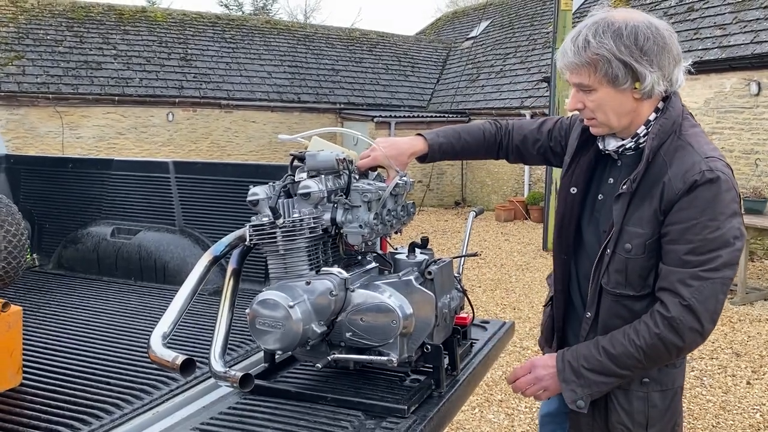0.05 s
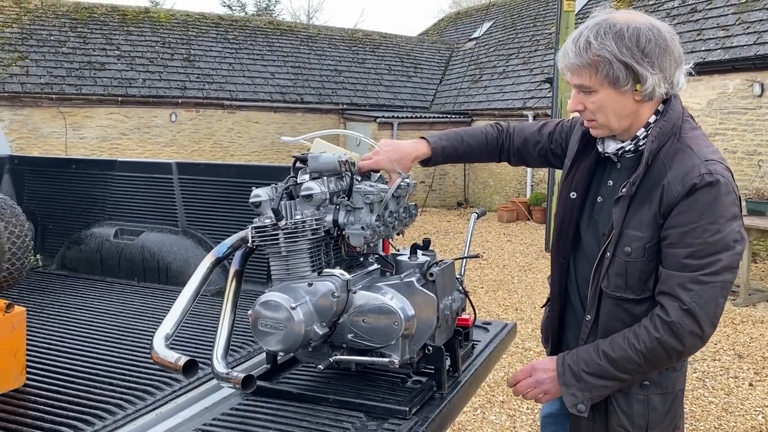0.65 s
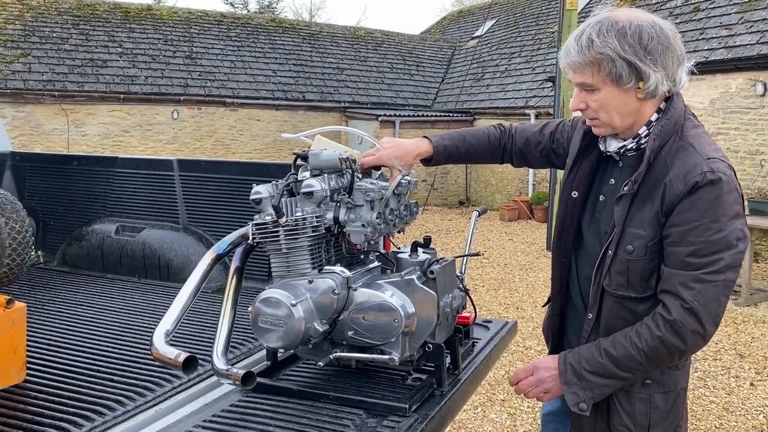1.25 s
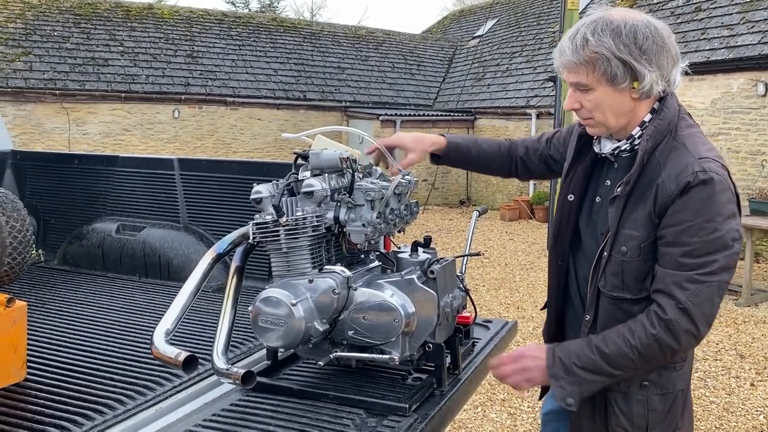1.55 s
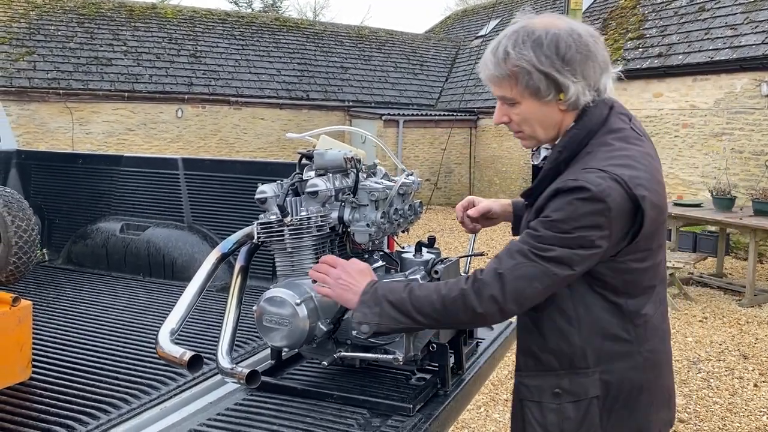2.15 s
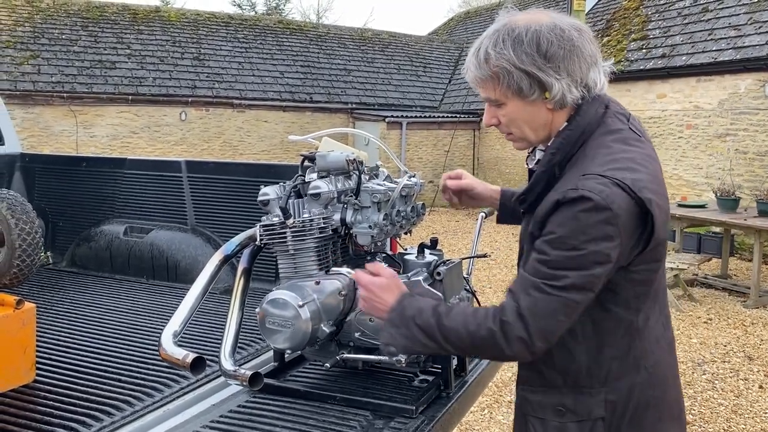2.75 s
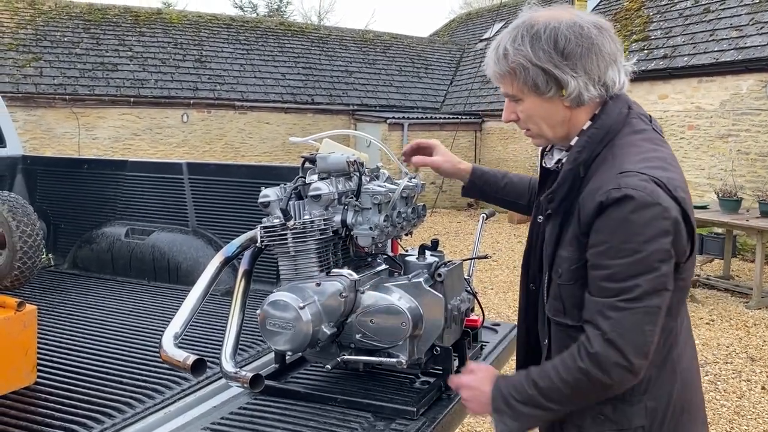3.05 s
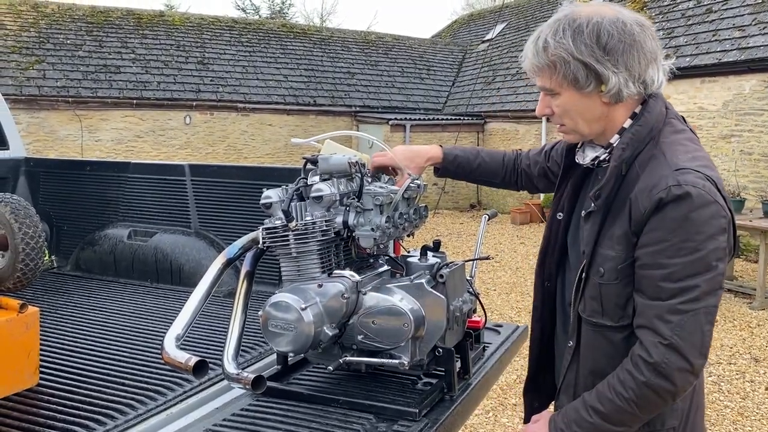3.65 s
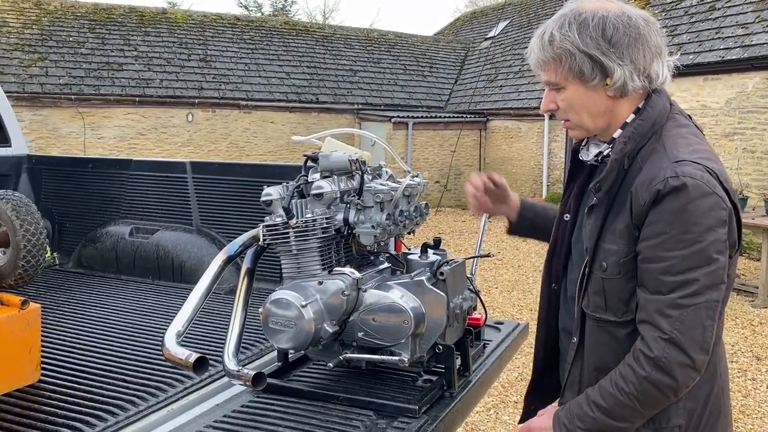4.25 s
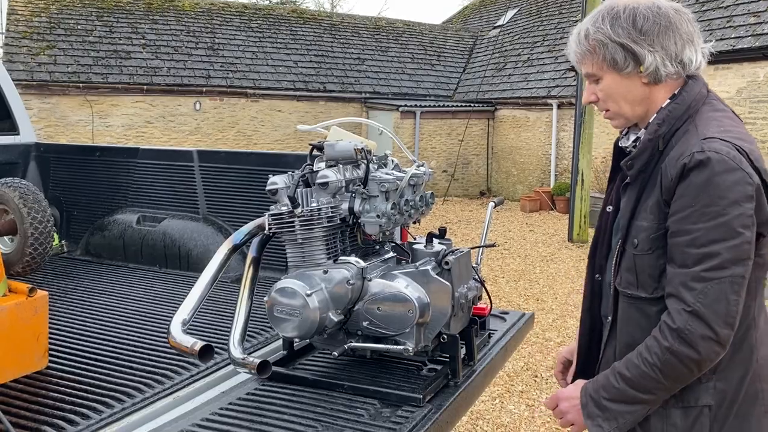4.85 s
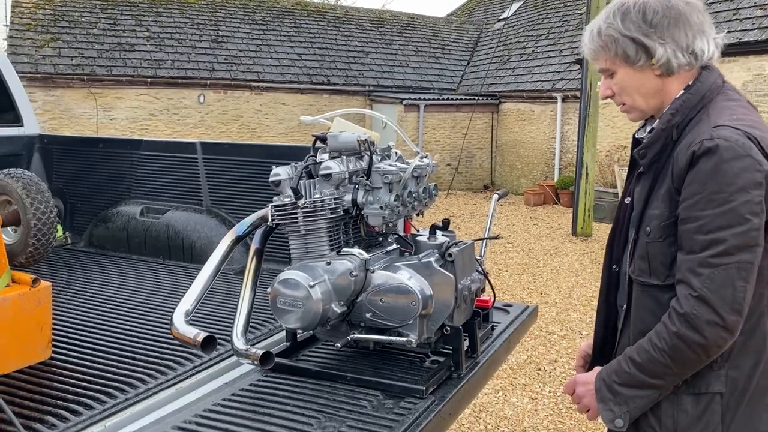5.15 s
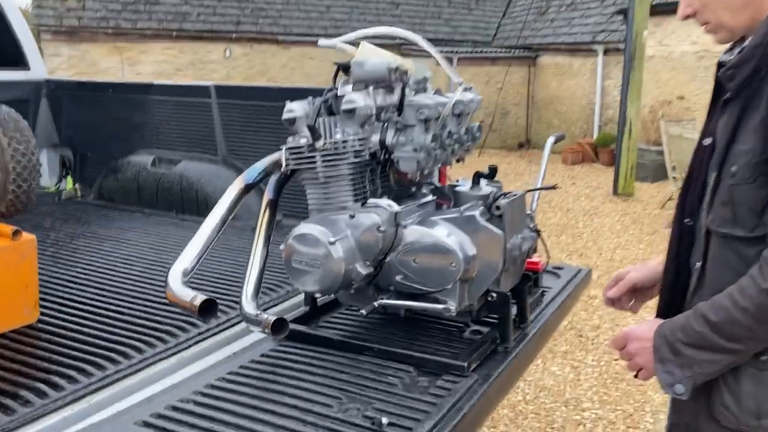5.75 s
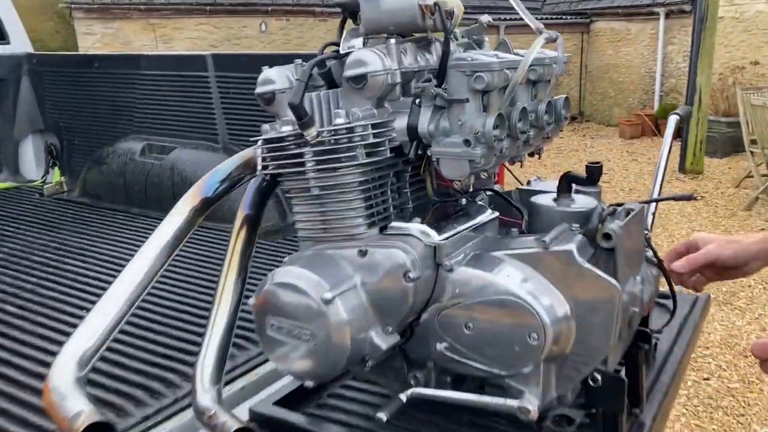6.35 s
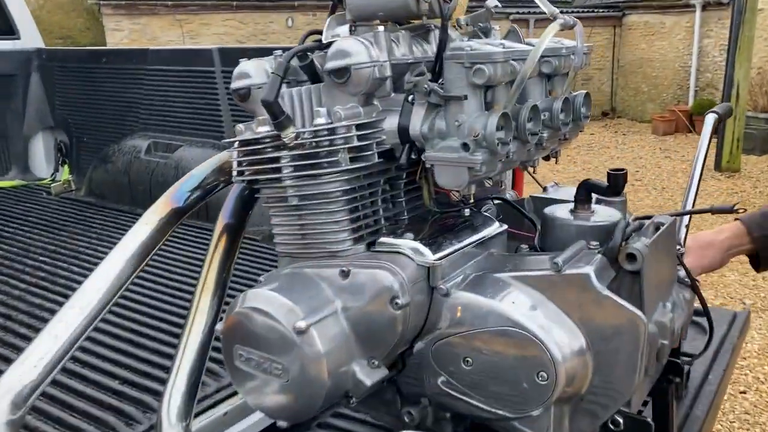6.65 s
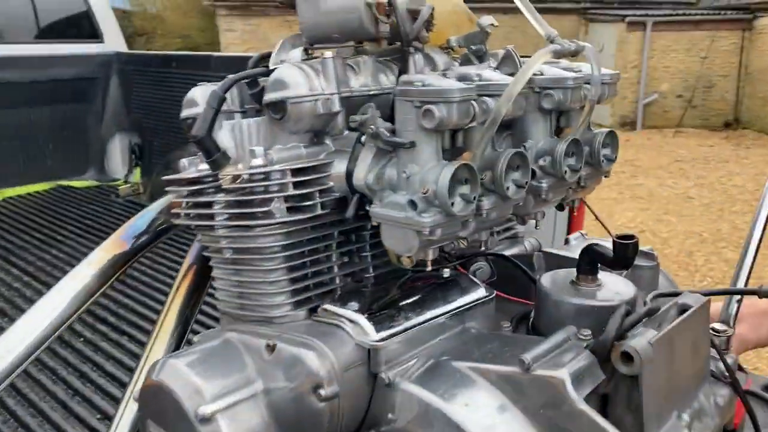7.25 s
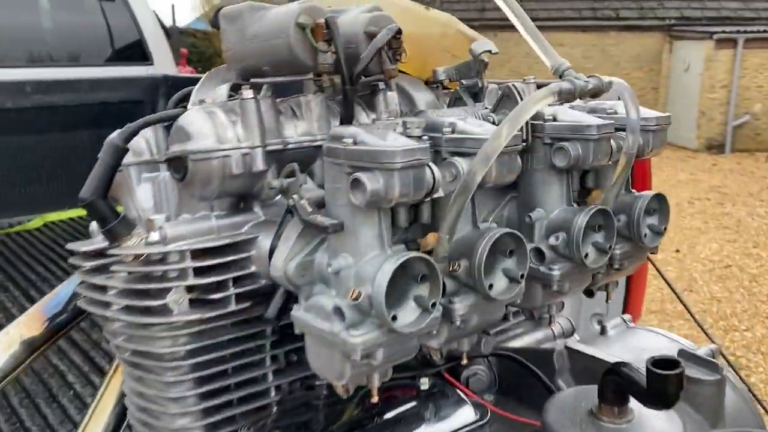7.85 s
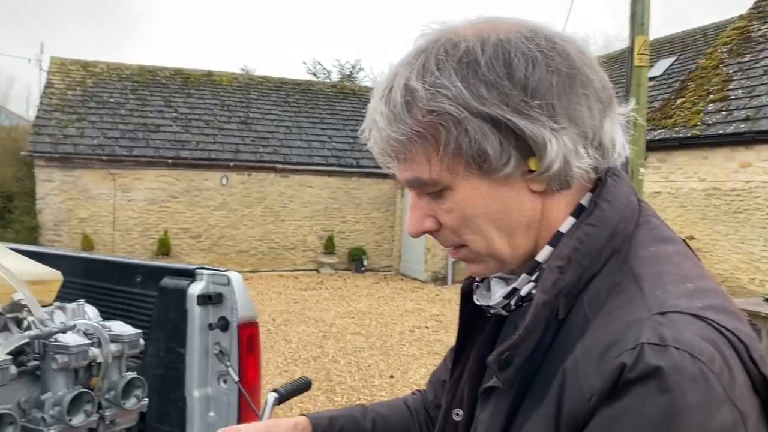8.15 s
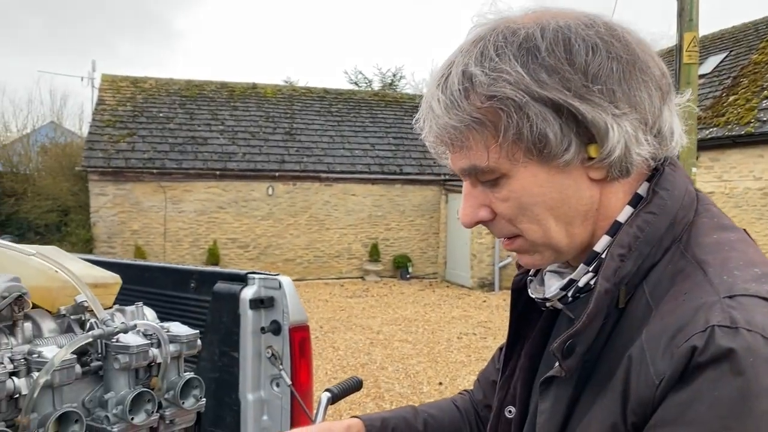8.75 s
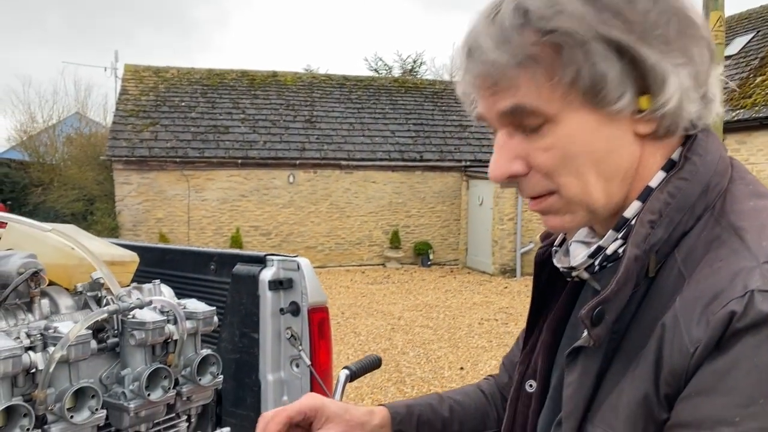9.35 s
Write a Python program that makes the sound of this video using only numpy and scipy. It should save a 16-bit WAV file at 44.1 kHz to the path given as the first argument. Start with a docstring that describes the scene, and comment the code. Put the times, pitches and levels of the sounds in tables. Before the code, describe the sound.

A motorcycle engine on open pipes revs once, settles to a loping idle, stalls, and is restarted by its electric starter.

```python
"""A bare four-cylinder motorcycle engine runs on open pipes on a pickup bed in a walled yard.
It is blipped, settles to a loping idle, dies, and is cranked back to life by the electric starter.
Every firing booms and rasps in its own pipe and spits hiss; one cylinder barks much harder than
the rest. Valve gear and chain clatter, the starter's gears grind, whine and knock on the case,
and the stone walls send back a short wash over a faint distant rumble."""
import sys
import numpy as np
from scipy import signal
from scipy.fft import rfft, irfft, next_fast_len
from scipy.io import wavfile
from scipy.ndimage import uniform_filter1d

SR = 44100
rng = np.random.default_rng(int(sys.argv[2]) if len(sys.argv) > 2 else 0)


def generate_wav(signal):
    """Clip the signal to [-1, 1] and save it as 16-bit WAV at the path in sys.argv[1]."""
    frames = np.transpose(np.atleast_2d(signal))
    scaled = np.clip(frames, -1, 1) * 32767
    pcm = np.round(scaled).astype(np.int16)
    wavfile.write(sys.argv[1], SR, pcm)


N = 423801
TIME = np.arange(N) / SR
DIRECT = np.array([[1], [0]])   # layers have a direct and a diffuse row; this fills only the first
IDLE_RPM, STANDSTILL_DB_PER_S = 1100, 401

# The cylinders in firing order, the barking one first. Each row: offset as a share of the cycle,
# boom in dB, boom tuning ratio, boom lag in seconds, rasp in dB, light spit in dB re the boom.
CYLINDERS = [(0, 1.5, 1.023, .002, 8.5, -40), (0.296, 1.6, 1.128, -.0051, -10.5, -14),
             (.555, -5.5, 1.101, -.0004, 0.5, -26.5), (.795, -5, 1.105, -.0021, -2, -27)]
# Crank speed, one run up to the stall and one from the restart. Each row: time in seconds, rpm.
CRANK_RUNS = [
    [(-.055, 1073), (.184, 1065), (.388, 2292), (.576, 1956), (.819, 1663), (1.259, 1475), (1.816, 1263),
     (2.358, 1260), (2.756, 1221), (3.439, 1096), (4.008, 1128), (5, 1071), (5.11, 1119), (6.03, 1066),
     (6.48, 1080), (6.63, 1095), (7.44, 812), (7.62, 400)],
    [(8.81, 1070), (9.04, 1017), (9.17, 1165), (9.61, 1282)],
]
# How hard the engine pulls. Each row: time in seconds, effort in dB re idle.
EFFORT = [(0, 5.5), (.12, 2.5), (.27, 7), (.45, 15.5), (.56, 10), (.67, 8), (1.1, 7), (3.1, 1), (3.7, 1.5),
          (5.5, 0), (6.55, -1), (6.85, -5.5), (7.1, -3.5), (7.4, -16.5), (8.81, -14), (8.97, -10),
          (9.4, -4.5)]
# The listener walks up to the engine and round to its rear.
# Each row: time in seconds, nearness in dB, left over right in dB.
WALK = [(0, -2, 1), (3.1, -1.5, 1.5), (5.5, 1, 0.5), (6.35, 5, 0.7), (7.2, 4.5, 1), (8.2, -6.5, 3),
        (8.8, 4.5, 2), (9.6, 5, 3)]
# Low and middle resonances of an open pipe and the bed under it.
# Each row: pitch in Hz before tuning, level in dB, t60 in seconds, swell in seconds.
BOOM_MODES = [(50, -36, 0.021, 0.034), (134.3, -1, 0.027, 0.004), (143.4, 5.5, 0.093, 0.033),
              (222.5, -22.5, 0.13, 0.012)]
RASP_MODES = [(406.7, -6, 0.091, 0.013), (478, -7.5, 0.1, 0.019), (569, -13.5, 0.08, 0.0099),
              (790, -26.5, 0.037, 0.0051), (897, -28, 0.046, 0.0028), (1084, -22, 0.13, 0.011),
              (1286, -25.5, 0.12, 0.0056)]
# The alloy crankcase and its fins. Each row: pitch in Hz, level in dB, t60 in seconds.
CASE_MODES = [(898, 3, 0.1), (1097.5, -6, 0.14), (1282, -0.5, 0.085), (1644, -12, 0.05), (1910, -29, 0.97),
              (2006, -10.5, 0.03), (2530, -12, 0.083), (2470, -20.5, 0.1), (2960, -16, 0.018),
              (4300, -35.5, .04), (6600, -18.5, 0.065)]
# Noise colours of valve gear, gas jets and gears. Each row: frequency in Hz, relative level in dB.
CLATTER_SPECTRUM = [(150, -5), (330, 7), (600, 6), (950, 3), (1300, -5), (1600, -1.5), (2900, -9),
                    (3500, -13), (4400, -17.5), (5800, -16), (6900, -16), (8000, -16.5), (10500, -18.5),
                    (13500, -18.5), (16000, -35)]
HISS_SPECTRUM = [(500, -13.5), (1300, -10.5), (1900, -2), (2350, 0), (2700, -4.5), (3000, -2.5),
                 (3450, -5.5), (4300, 1), (5000, -3), (5500, -7), (6000, -5.5), (6900, 0), (7600, -2),
                 (8400, -3.5), (9300, 1), (10500, -1.5), (11800, 1.5), (13200, -3.5), (14500, -6),
                 (16000, -10.5)]
GRIND_SPECTRUM = [(100, -14.5), (300, -4), (750, -12.5), (840, -1), (905, 5), (990, -1), (1200, -2.5),
                  (1305, 7.5), (1420, -2.5), (2400, -3), (3300, -10), (4500, -14.5), (7000, -12.5),
                  (10000, -16), (14000, -26), (16000, -43.5)]


def exhaust(boom_gain, valve_lead_s=0.00399, jitter_s=0.00037, scatter_t60=0.19):
    """Each blowdown rings its pipe; the ribbed bed scatters it, differently for every pipe mouth."""
    # Colour of the scatter. Each row: frequency in Hz, relative level in dB.
    scatter_spectrum = [(200, -22), (262, 21.5), (340, -10), (430, 5.5), (570, -6), (700, -15.5),
                        (1100, -10), (1500, -33), (2500, -22.5), (5000, -43.5)]
    boom, rasp, t = 0, 0, TIME[:SR // 6]
    rasp_ring = pipe(RASP_MODES, 0.96, glide=0.034, heat_s=0.016) * DIRECT
    scatter_shape = from_db(-17 - 60 * t / scatter_t60) * (1 - np.exp(-t / 0.001))
    for share, boom_db, tuning, lag, rasp_db, _ in CYLINDERS:
        times = firings(share)
        late, boom_luck, rasp_luck = rng.standard_normal((len(times), 3)).T
        times = times + jitter_s * late
        burn_db = 0.38 * odd_burns(times) * (share == 0)   # a misfire hardly booms
        boom_ring = pipe(BOOM_MODES, tuning, glide=0.33, heat_s=0.0097)
        boom += through(clicks(times + lag, from_db(boom_db + burn_db + 2 * boom_luck)), boom_ring)
        blowdowns = clicks(times - valve_lead_s, from_db(rasp_db + burn_db + 2.5 * rasp_luck))
        rasp += through(blowdowns, rasp_ring + scatter_shape * noise(scatter_spectrum, len(t)))
    boom = filtered(boom, 2, 34, "high")   # a small mouth radiates no deep bass
    rasp_gain = exhaust_gain(-31.5 + in_time(EFFORT)[0])
    return boom_gain * evened(boom * DIRECT) + rasp_gain * evened(rasp)


def pipe(modes, tuning, glide, heat_s):
    """Standing waves build up and die; hot gas pulls their pitch up, then it sags as the pipe cools."""
    t = TIME[:SR // 6]
    heat = t / heat_s * np.exp(1 - t / heat_s)
    clock = np.cumsum(tuning * (1 + glide * (heat - .85))) / SR
    return sum(from_db(db - 60 * t / t60) * (1 - np.exp(-t / swell)) ** 2
               * np.sin(2 * np.pi * hz * clock) for hz, db, t60, swell in modes)


def throats(detune=0.012, limit_octaves=0.596):
    """Hot gas bends each pipe's note: a rising whoop after the bark, steadier elsewhere and at speed."""
    # One note per pipe. Each row: delay at idle in seconds, level in dB, base pitch in Hz, sweep at
    # idle in octaves per second, swell and fade in seconds, weight of the effort, brightness in dB.
    pipe_notes = [(.015, 1.5, 430, 23, 0.011, 0.016, 0.93, 0.5),
                  (0.00095, -7, 592, 0, 0.007, 0.011, 1.03, 0),
                  (0.00501, 0, 476, -0.5, 0.0037, 0.016, 1.01, 0.5),
                  (.008, -8, 462, 9, 0.0074, 0.013, 1.24, 7.5)]
    # The tone drifts. Each row: time in seconds, brightness in dB, lift in dB, pitch ratio.
    colour_drift = [(0, -5.5, -1, 0.99), (5.5, 5, 0.5, 0.98), (6.2, 6.5, 0.5, 0.99), (6.33, 11, 2.5, 0.99),
                    (6.52, 6, 1, 0.97), (6.66, 10.5, 1.5, 1.02), (6.8, 5, -0.5, 1.075), (7.3, 3, 1.5, 1),
                    (8.9, -1, 6, 1.05), (9.3, 3.5, 3.5, 1.07), (9.6, -6, -3.5, 1.07)]
    # Higher standing waves. Each row: pitch ratio, level in dB.
    overtones = [(1.699, -21.5), (2.4, -22.5), (3.051, -28.5)]
    t, out = np.arange(-SR // 25, SR // 20) / SR, np.zeros(N + SR)
    for (share, *_), (delay, db, hz, sweep, swell, fade, follows, edge_db) in zip(CYLINDERS, pipe_notes):
        times = firings(share)
        slowness = IDLE_RPM / in_time(np.concatenate(CRANK_RUNS), times)[0]
        bright_db, lift_db, pitch = in_time(colour_drift, times)
        burn_db = 0.18 * odd_burns(times) * (share == 0)
        levels_db = db + lift_db + follows * in_time(EFFORT, times)[0] + burn_db
        peaks_s = times + delay * slowness ** 2.62
        bends = sweep * slowness ** 1.31
        for i, peak_s in enumerate(peaks_s):
            bend_luck, pitch_luck, phase_luck, level_luck = rng.standard_normal(4)
            octaves = limit_octaves * np.tanh(bends[i] * (1 + 0.18 * bend_luck) * t / limit_octaves)
            note_hz = hz * pitch[i] * (1 + detune * pitch_luck) * 2 ** octaves
            phase = 2 * np.pi * np.cumsum(note_hz) / SR + np.pi * phase_luck
            tone = np.sin(phase)
            for ratio, overtone_db in overtones:
                gain = from_db(overtone_db + bright_db[i] + edge_db + 5 * rng.standard_normal())
                tone += gain * np.sin(ratio * phase)
            shape = np.exp(-abs(t / np.where(t < 0, swell, fade)) ** 0.94)
            at = int((peak_s + t[0]) * SR) + SR // 2
            out[at:at + len(t)] += from_db(levels_db[i] + 2.5 * level_luck) * shape * tone
    return exhaust_gain(-20.5) * out[SR // 2:][:N] * DIRECT


def jets(boom_gain, uneven_db=1.28, bark_db_per_rpm=0.0077):
    """Gas tears out: one hard, tube-ringing bark a cycle and three light spits, plus the intake rush."""
    # The steel header tube. Each row: pitch in Hz, level in dB, t60 in seconds.
    tube_modes = [(1827, -18, 0.043), (2130, -12.5, .045), (2904, -17, 0.052)]
    rpm, = in_time(np.concatenate(CRANK_RUNS))
    bark_gain = exhaust_gain(-16.5 + bark_db_per_rpm * (rpm - IDLE_RPM))
    times = firings(0)
    bark_db = odd_burns(times) + uneven_db * rng.standard_normal(len(times))
    bark = spurts(times, bark_db, rise=0.0012, fall=0.00056, tail_db=-8.5, tail=0.0029)
    crack = spurts(times, bark_db, rise=0.00007, fall=0.00007, tail_db=-24.5, tail=0.001)
    tube = bark_gain * struck(tube_modes, times, bark_db)
    power = bark_gain ** 2 * (bark + crack) + intake_gulp() ** 2
    for share, *_, hiss_db in CYLINDERS[1:]:
        times = firings(share)
        spit_db = hiss_db + uneven_db * rng.standard_normal(len(times))
        power += boom_gain ** 2 * spurts(times, spit_db, rise=.0013, fall=.0014, tail_db=-11, tail=.0029)
    return np.sqrt(power) * bed_bounce(noise(HISS_SPECTRUM)) + tube * DIRECT


def bed_bounce(jet, delay_s=0.000919, wander=0.229):
    """The jet flaps above the bed, so its reflection combs every spurt a little differently."""
    flap = np.interp(TIME, np.arange(100) / 10, rng.standard_normal(100))
    late = TIME - delay_s * np.exp(wander * flap)
    return rms_one(jet + 0.95 * np.array([np.interp(late, TIME, row) for row in jet]))


def coughs(puff_delay_s=0.006):
    """As the engine catches, rich first burns thump the pipe, rasp and blow a rough puff out of it."""
    # Each row: start in seconds, then boom, rasp and puff in dB.
    first_burns = [(8.81, -14, -34, -24), (8.852, -4, -16, -29)]
    times, boom_db, rasp_db, puff_db = np.transpose(first_burns)
    thump = pipe(BOOM_MODES, 1.03, glide=0.29, heat_s=0.008)
    rasp = pipe(RASP_MODES, 0.85, glide=0.3, heat_s=0.03)
    rings = sum(through(clicks(times, from_db(db)), ring / abs(ring).max())
                for db, ring in ((boom_db, thump), (rasp_db, rasp)))
    puffs = spurts(times + puff_delay_s, puff_db, rise=0.0027, fall=0.012, tail_db=-13, tail=0.037)
    return rings * DIRECT + np.sqrt(puffs) * noise(CLATTER_SPECTRUM)


def firings(share, steps_per_s=2000):
    """Times at which a cylinder exhausts, a given share of a cycle after each bark."""
    # The first bark of each run, in seconds.
    first_barks = [.0571, 8.878]
    times = []
    for run, first in zip(CRANK_RUNS, first_barks):
        t = np.arange(run[0][0], run[-1][0], 1 / steps_per_s)
        cycles = np.cumsum(in_time(run, t)[0]) / (2 * 60 * steps_per_s)   # four-stroke: two turns each
        cycles = cycles - np.interp(first, t, cycles) - share
        times.append(np.interp(np.arange(np.ceil(cycles[0]), cycles[-1]), cycles, t))
    return np.concatenate(times)


def odd_burns(times):
    """Each misfire or extra hard bang shifts the level of the firing nearest to it, in dB."""
    # Each row: time in seconds, level in dB re the usual bark.
    burns = [(.17, 10), (.26, 9.5), (.33, 5.5), (.39, -20.5), (.44, -4), (.5, -20.5), (.56, -7), (.62, -10),
             (.68, -15.5), (.75, 3), (1.04, -17), (1.2, -6.5), (1.45, -27.5), (2.09, 2), (2.47, 0),
             (2.57, 3), (2.77, -40), (3.07, -44.5), (4.47, -43.5), (4.9, -6), (5.12, 4), (5.23, -12),
             (5.45, -38), (6.0, 2.5), (6.23, 3.5), (6.45, -3), (6.67, 1.5), (7.03, -2), (7.29, -14),
             (7.43, -27.5), (8.88, 2.5), (8.99, -33.5), (9.11, -5), (9.21, -10), (9.31, -5.5), (9.51, -2)]
    s, db = np.transpose(burns)
    return np.bincount(abs(times - s[:, None]).argmin(axis=1), db, len(times))


def running(stall_db_per_s, stall_s=7.393, catch_s=0.067):
    """Gain that swells as the engine catches, fades as it coasts and drops once the crank stops."""
    turning = sum(np.minimum(since(run[0][0]) / catch_s, 1)
                  * from_db(-STANDSTILL_DB_PER_S * since(run[-1][0])) for run in CRANK_RUNS)
    restart_s = CRANK_RUNS[1][0][0]
    return turning * from_db(-stall_db_per_s * since(stall_s) * (TIME < restart_s))


def exhaust_gain(db):
    """A pipe layer grows as the listener nears and dies quickly when combustion stops."""
    return running(stall_db_per_s=171) * from_db(db + in_time(WALK)[0])


def intake_gulp(peak_s=0.18, hold_s=0.12, rise_db_per_s=348, fall_db_per_s=90):
    """Gain of the air gulped through the open carburettors at the blip."""
    early = np.maximum(peak_s - TIME, 0)
    return from_db(-34 - rise_db_per_s * early - fall_db_per_s * since(peak_s + hold_s))


def clatter(clack_t60=0.14, uneven_db=3.5, contacts_per_s=220):
    """Each cylinder's valve gear repeats its own clack; the chain rattles on the case and whirrs."""
    t, clacks = TIME[:SR // 5], 0
    for share, *_ in CYLINDERS:
        times = firings(share)
        clack = noise(CLATTER_SPECTRUM, len(t)) * from_db(-60 * t / clack_t60)
        clacks += through(clicks(times, from_db(uneven_db * rng.standard_normal(len(times)))), clack)
    when, force = rng.random((int(contacts_per_s * N / SR), 2)).T
    chain = rms_one(struck(CASE_MODES, when * N / SR, 11.5 * force)) * DIRECT
    whirr = noise(CLATTER_SPECTRUM)
    # The bare engine gains more from a close listener than the pipes do.
    steady = running(stall_db_per_s=83) * from_db(-32 + 1.15 * in_time(WALK)[0])
    snatch = from_db(7.5) * intake_gulp()   # the blip shakes the chain
    gain = np.sqrt(steady ** 2 + snatch ** 2 + kickback() ** 2)
    return gain * (from_db(-2) * rms_one(clacks) + from_db(-10) * chain + from_db(-8) * whirr)


def kickback(start_s=7.497, hold_s=0.087, sag_db_per_s=70):
    """Gain of the chain's rattle as the dying engine rocks back off compression."""
    fade_db = sag_db_per_s * since(start_s) + STANDSTILL_DB_PER_S * since(start_s + hold_s)
    return (TIME > start_s) * from_db(-37.5 - fade_db)


def starter(waver=0.004, chatter=0.32, full_bite_db=-26):
    """Gears grind and whine as the motor hauls the pistons over compression; teeth knock on the case."""
    # Gear mesh, dragged down by compression and freed over the top. Each row: time in seconds, Hz.
    mesh_curve = [(8.02, 419), (8.08, 583), (8.14, 460.4), (8.34, 345), (8.375, 400.6), (8.392, 453),
                  (8.408, 531.4), (8.43, 562.3), (8.455, 592.5), (8.485, 596), (8.52, 575), (8.545, 533),
                  (8.57, 453), (8.6, 427.6), (8.625, 290.2), (8.67, 270.5), (8.712, 790), (8.738, 664),
                  (8.76, 629), (8.79, 432), (8.85, 434)]
    # How the gears shake in their backlash. Each row: rate in Hz, relative level in dB.
    shake_spectrum = [(30, -1), (120, -8.5), (400, -49)]
    # How the housing radiates the whine. Each row: frequency in Hz, gain in dB.
    housing = [(450, -10.5), (600, -21), (720, -22), (900, 2), (1050, -13), (1200, 1), (1310, 7.5),
               (1480, -9), (1780, -6.5), (2050, -12), (2400, -14), (3600, -18)]
    mesh_hz, = in_time(mesh_curve)
    gain = starter_gain(mesh_hz)
    bite = np.clip(gain / from_db(full_bite_db), 0, 1) ** .5   # coasting gears are dull and hardly whine
    teeth = np.cumsum(mesh_hz * (1 + waver * noise(shake_spectrum)[0])) / SR
    cranking, whine = TIME > 8, np.zeros(N)
    for k in range(2, 12):   # strong and weak teeth alternate, adding lines between the mesh harmonics
        grip = 1 + chatter * noise(shake_spectrum, cranking.sum())[0]
        line_db = at_hz(housing, k / 2 * mesh_hz[cranking]) - 8 * (k % 2)
        whine[cranking] += grip * from_db(line_db) * np.sin(np.pi * k * teeth[cranking])
    times = np.interp(np.arange(teeth[cranking][0], teeth[-1]), teeth, TIME)
    knocking = struck(CASE_MODES, times, 5 * rng.standard_normal(len(times)))
    gears = from_db(2.5) * bite ** 1.74 * whine + from_db(-10) * knocking / knocking[cranking].std()
    grind = noise(GRIND_SPECTRUM)
    dull = filtered(grind, 1, 2000, "low")
    return gain * (from_db(-7) * (dull + bite * (grind - dull)) + gears * DIRECT)


def starter_gain(mesh_hz, free_mesh_hz=620, take_up_s=0.021, run_down_db_per_s=116.5):
    """The gears take up on each press, run down after it, and go quiet when compression slows them."""
    # A short jab of the button, then a full crank. Each row: start and hold in seconds, level in dB.
    presses = [(8.02, 0.081, -30), (8.338, 0.44, -25.5)]
    pressed = sum((1 - np.exp(-since(s) / take_up_s)) * from_db(db - run_down_db_per_s * since(s + held))
                  for s, held, db in presses)
    return pressed * (mesh_hz / free_mesh_hz) ** 1.01


def knocks_and_catch():
    """Knocks and clicks of the stall and starter, ending in a sharp exhaust bark as the engine catches."""
    # Each row: time in seconds, then case ring, bright burst and dull burst in dB.
    hits = [(7.496, -27, -51, -29), (7.606, -54.5, -62, -47), (7.772, -57, -80, -68),
            (7.913, -78, -56, -76), (8.023, -60, -32, -46), (8.075, -28, -28.5, -40),
            (8.299, -57, -53, -63), (8.319, -65, -48, -55), (8.388, -31, -39, -33.5),
            (8.435, -25, -35.5, -31.5), (8.678, -16.5, -22, -28.5), (8.688, -25, -31, -26.5),
            (8.702, -26.5, -22.5, -24), (8.731, -35, -33, -28), (8.831, -24, -41, -21),
            (8.851, -40, -12.5, -34)]
    times, ring_db, bright_db, dull_db = np.transpose(hits)
    bright = spurts(times, bright_db, rise=0.0004, fall=0.0017, tail_db=-19, tail=0.01)
    dull = spurts(times, dull_db, rise=0.0005, fall=0.0045, tail_db=-7.5, tail=0.019)
    bursts = np.sqrt(bright) * noise(HISS_SPECTRUM) + np.sqrt(dull) * noise(GRIND_SPECTRUM)
    ring = struck(CASE_MODES, times, ring_db, uneven_db=2)
    return bursts + filtered(ring, 2, 600, "high") * DIRECT


def sizzle():
    """The running gear gives off a thin sizzle, heard from close by."""
    # Each row: frequency in Hz, relative level in dB.
    spectrum = [(5000, -35), (6400, -6.5), (6900, 0), (7400, -9), (8500, -31.5)]
    return running(stall_db_per_s=13) * from_db(-62.5 + 2.5 * in_time(WALK)[0]) * noise(spectrum)


def yard_echo(engine, t60=0.32, delay_s=0.027):
    """Stone walls send back a dull, short wash."""
    t = TIME[:SR // 2]
    wash = noise([(60, 5), (200, 4.5), (450, 4), (1000, 3), (4000, -9), (14000, -14.5)], len(t))
    wash = wash * from_db(-60 * t / t60) * (t > delay_s)
    return from_db(-17) * through(engine[0], rms_one(wash) / np.sqrt(len(t)))


def distant_rumble():
    """A faint, steady rumble lies under everything."""
    # Each row: frequency in Hz, relative level in dB.
    spectrum = [(18, -40), (30, -16.5), (86, 7), (359, -30.5), (781, -27), (1700, -42), (1920, -34.5),
                (2600, -46.5), (12000, -42.5), (15600, -82.5), (22000, -120)]
    return from_db(-53) * noise(spectrum)


def stereo_image(layers):
    """Two close microphones hear the direct part with a tilt and a lag, the diffuse part in opposition."""
    # Each row: frequency in Hz, likeness of the two sides from 0 to 1.
    likeness = [(60, 0.87), (150, 0.98), (290, 0.94), (600, 0.99), (1400, 0.35), (2800, 0.93), (4400, 1),
                (6000, 0.25), (7200, 0.96), (10000, 0.95), (14000, 1)]
    # Each row: frequency in Hz, left over right in dB.
    lean = [(60, 0), (110, -1), (200, 0), (380, 1.5), (700, 2.5), (1290, 5), (2380, -1), (4400, -3.5),
            (8120, -4), (15000, 0)]
    # Each row: frequency in Hz, phase lead of the left side in radians.
    lead = [(60, -0.097), (300, 0.41), (900, 0.61), (1800, 0.0014), (3600, -1), (4800, -0.96),
            (5600, -1.74), (8300, -1.98), (10000, -1.24), (13500, -0.022)]
    padded = next_fast_len(N + SR // 10, True)
    hz = np.fft.rfftfreq(padded, 1 / SR)
    direct, diffuse = rfft(layers, padded)
    sides = np.array([[1], [-1]])
    alike = at_hz(likeness, hz)
    both = np.sqrt((1 + alike) / 2) * direct + np.sqrt((1 - alike) / 2) * diffuse * sides
    both *= from_db(sides * at_hz(lean, hz) / 2) * np.exp(.5j * sides * at_hz(lead, hz))
    return irfft(both, padded)[:, :N] * from_db(sides * in_time(WALK)[1] / 2)


def struck(modes, times, level_db, uneven_db=4):
    """A metal part rings; every contact favours other modes."""
    out = 0
    for hz, db, t60 in modes:
        blows = clicks(times, from_db(level_db + db + uneven_db * rng.uniform(-0.75, 1, len(times))))
        decay, turn = from_db(-60 / (t60 * SR)), 2 * np.pi * hz / SR
        out += signal.lfilter([0, np.sin(turn)], [1, -2 * decay * np.cos(turn), decay ** 2], blows + 1e-18)
    return out


def spurts(times, levels_db, rise, fall, tail_db, tail):
    """Power envelope of bursts that swell to a cusp, collapse and leave a wash; times in seconds."""
    t = np.arange(-SR // 50, SR // 6) / SR
    collapse = np.exp(-abs(t) / fall) + from_db(tail_db) ** 2 * np.exp(-abs(t) / tail)
    shape = np.where(t < 0, np.exp(-abs(t) / rise), collapse)
    return abs(signal.oaconvolve(clicks(times, from_db(levels_db) ** 2), shape)[SR // 50:][:N])


def noise(spectrum, size=N):
    """Two unrelated coloured noises: the direct and the diffuse part of a sound."""
    padded = next_fast_len(size, True)
    colour = from_db(at_hz(spectrum, np.fft.rfftfreq(padded, 1 / SR)))
    return rms_one(irfft(rfft(rng.standard_normal((2, padded))) * colour, padded)[:, :size])


def clicks(times, heights):
    """One impulse per event."""
    at = np.round(np.asarray(times) * SR).astype(int)
    inside = (at >= 0) & (at < N)
    return np.bincount(at[inside], heights[inside], N)


def through(x, response):
    """Pass a sound through an impulse response."""
    return signal.oaconvolve(np.atleast_2d(x), np.atleast_2d(response), axes=-1)[:, :N]


def filtered(x, order, hz, kind):
    """A gentle low-pass or high-pass."""
    return signal.sosfilt(signal.butter(order, hz, kind, fs=SR, output="sos"), x)


def evened(x):
    """Level a sound over a few engine cycles, keeping the throb within them."""
    power = uniform_filter1d(uniform_filter1d(x[0] ** 2, size=9500), size=9500)
    return x / np.sqrt(abs(power) + power.mean() / 100)


def rms_one(x):
    """Scale to unit power."""
    return x / np.sqrt(np.mean(x ** 2) + 1e-20)


def from_db(db):
    """Decibels to gain."""
    return 10 ** (np.asarray(db) / 20)


def since(start_s):
    """Seconds since a moment, zero before it."""
    return np.maximum(TIME - start_s, 0)


def in_time(rows, times=TIME):
    """Read the columns of a curve at the given times."""
    s, *columns = np.transpose(rows)
    return [np.interp(times, s, column) for column in columns]


def at_hz(points, hz):
    """Read a spectrum on a log-frequency axis."""
    points_hz, value = np.transpose(points)
    return np.interp(np.log(hz + 1e-3), np.log(points_hz), value)


def scene():
    """Engine and starter in the yard, over a faint distant rumble."""
    boom_gain = exhaust_gain(-13.5 + 0.3 * in_time(EFFORT)[0])
    pipes = exhaust(boom_gain) + throats() + jets(boom_gain) + coughs()
    engine = pipes + clatter() + sizzle() + starter() + knocks_and_catch()
    return stereo_image(engine + yard_echo(engine) + distant_rumble())


def record(dry, cutoff_hz=16000):
    """The highest peaks are rounded and the top is cut."""
    rounded = dry / (1 + dry ** 6) ** (1 / 6)
    return signal.sosfiltfilt(signal.ellip(8, .1, 60, cutoff_hz, fs=SR, output="sos"), rounded)


dry = scene()
out = record(dry)
generate_wav(out)
```